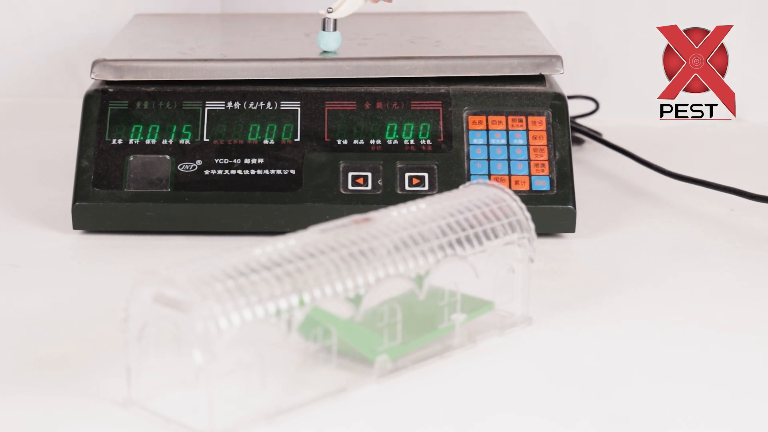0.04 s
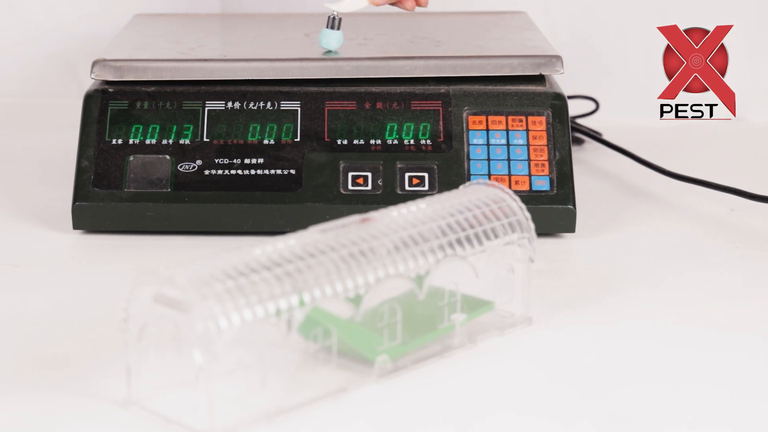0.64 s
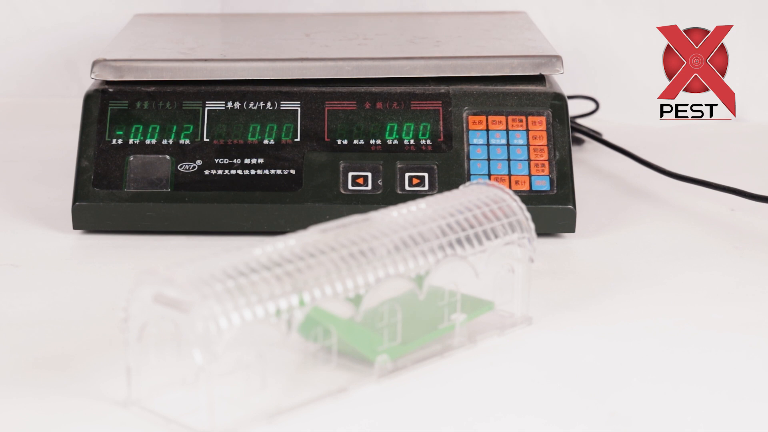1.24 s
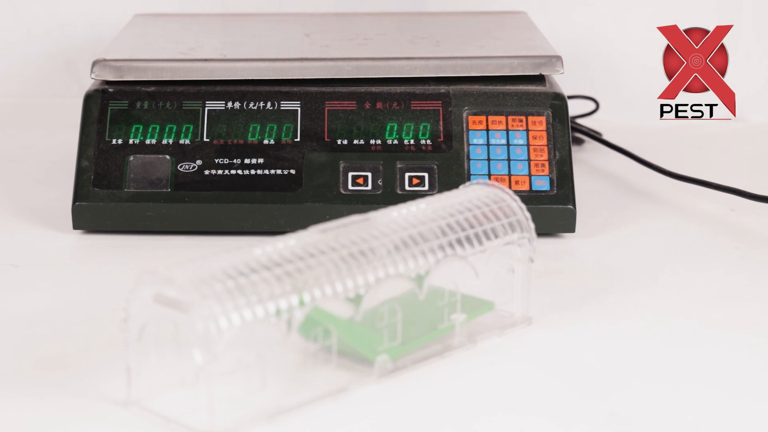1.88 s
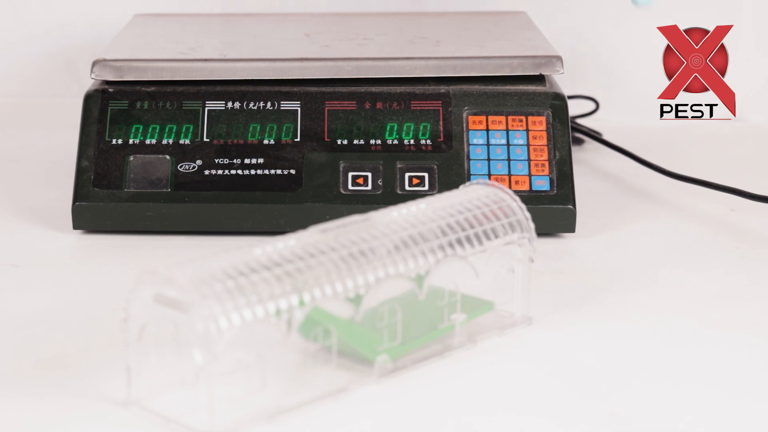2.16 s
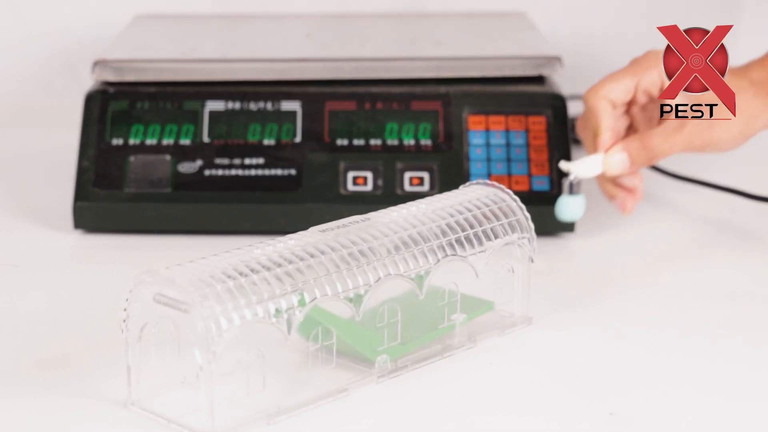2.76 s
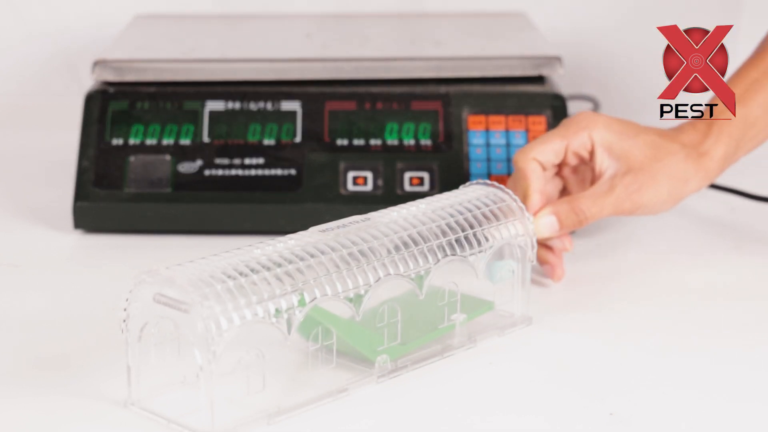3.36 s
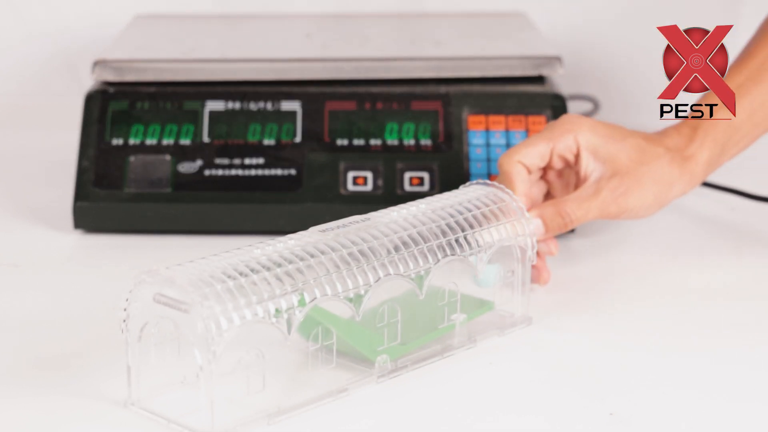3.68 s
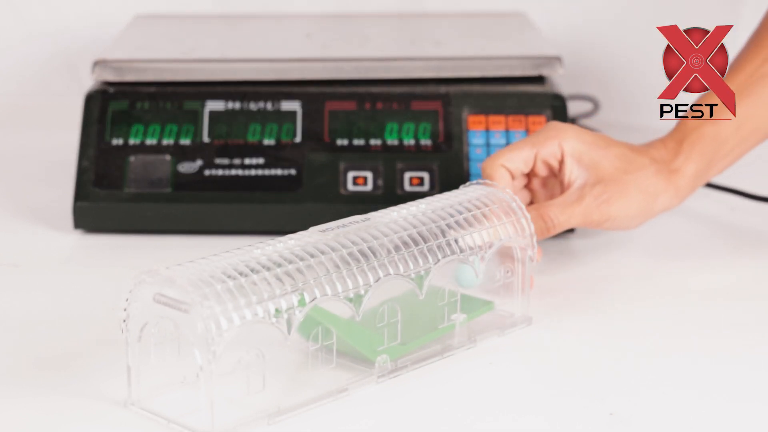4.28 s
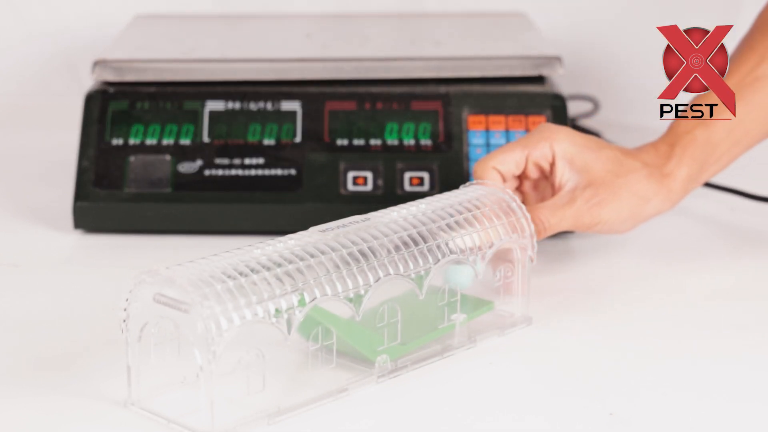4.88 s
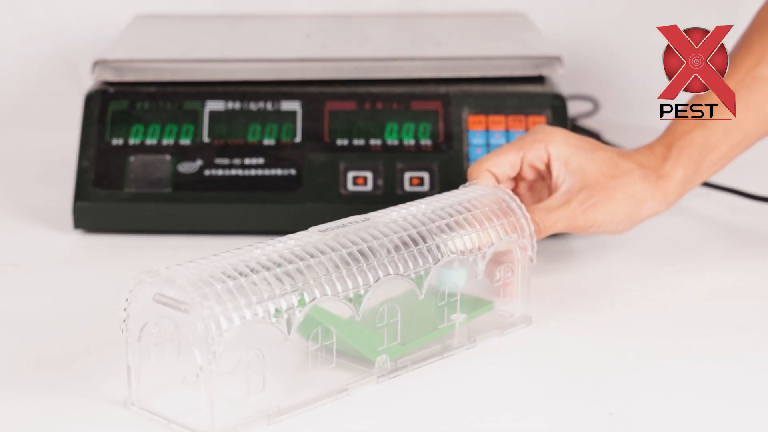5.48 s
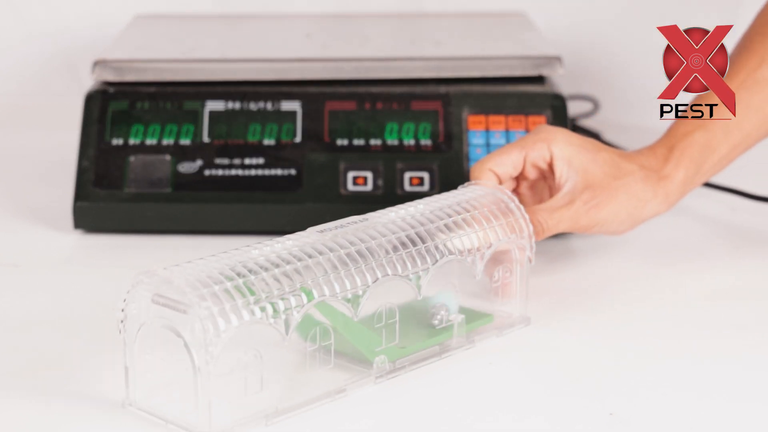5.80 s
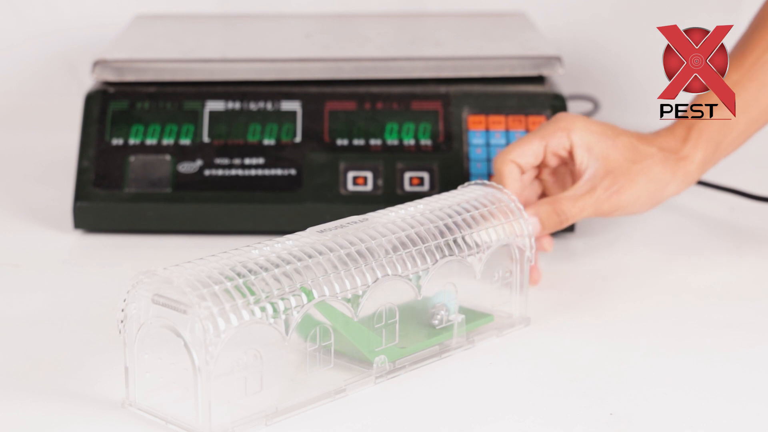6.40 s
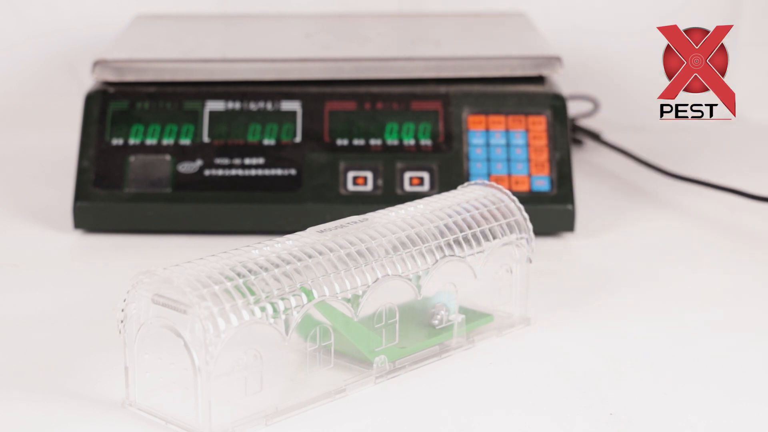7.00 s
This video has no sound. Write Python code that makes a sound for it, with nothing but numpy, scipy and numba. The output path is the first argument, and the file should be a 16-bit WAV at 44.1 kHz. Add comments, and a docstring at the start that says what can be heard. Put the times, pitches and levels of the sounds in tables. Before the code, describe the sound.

After faint ticks and scuffs over a steady ventilation hum, a plastic trap door snaps loudly shut, rebounds and rattles.

```python
"""Ventilation hums throughout in a small bare room. Early on come far ticks and a shuffle that bumps
something hollow, then two fainter scuffs. At 5.6 s a small weight tips the treadle of a plastic tunnel
trap: the latch slips, and the door slams, rebounds and rattles. Every blow rings the same shell and
fills the room. The microphones overload on the slam; the gain control ducks and recovers."""
import sys
import numpy as np
from scipy import signal
from scipy.fft import rfft, irfft
from scipy.io import wavfile
from scipy.ndimage import uniform_filter1d
from numba import njit

SR = 44100
rng = np.random.default_rng(int(sys.argv[2]) if len(sys.argv) > 2 else 0)


def dump(signal):
    """Clip the signal to [-1, 1] and save it as 16-bit WAV at the path in sys.argv[1]."""
    limited = np.clip(np.atleast_2d(signal).T, -1, 1)
    pcm = np.round(limited * 32767).astype(np.int16)
    wavfile.write(sys.argv[1], SR, pcm)


N = 319284
T = np.arange(N) / SR
RING_T = T[:int(.7 * SR)]


def undb(db):
    """Decibels to gain."""
    return 10 ** (np.asarray(db) / 20)


def fade(t60_s):
    """Exponential ring-down."""
    return np.exp(-np.log(1000) * RING_T / t60_s)


def unit_energy(x):
    """Scale to a mean energy of 1 per channel."""
    return x / np.sqrt(np.sum(x ** 2) / len(np.atleast_2d(x)))


def on_log_axis(hz, points):
    """Interpolate (freq_hz, value) points over log frequency."""
    freq_hz, value = np.transpose(points)
    return np.interp(np.log(hz + 1e-9), np.log(freq_hz), value)


def drift(rate_hz):
    """Smooth random drift, spread near 1."""
    knots = np.arange(0, T[-1] + 1, 1 / rate_hz)
    return np.interp(T, knots, rng.standard_normal(len(knots)))


def convolve(x, response):
    """Apply a response, keeping the length."""
    return signal.fftconvolve(x, np.atleast_2d(response), axes=1)[:, :x.shape[1]]


def add(out, start_s, x):
    """Mix x into out."""
    i = int(start_s * SR)
    out[:, i:i + x.shape[1]] += x[:, :N - i]


# Diffuse field at two close microphones: freq_hz, side_minus_mid_db
STEREO_WIDTH = [(60, -31), (110, -34.5), (200, -21.5), (380, -16.5), (700, -8), (1290, -5.5), (2380, 0),
                (4400, 0.5), (8120, 2), (15000, -3)]

def noise(colour, size, width_db=0):
    """Coloured stereo noise, rms 1: channels alike in the bass, unrelated in the treble."""
    hz = np.fft.rfftfreq(size, 1 / SR)
    mid, side = rfft(rng.standard_normal((2, size)))
    width = undb(on_log_axis(hz, STEREO_WIDTH) + width_db)
    pair = np.array([mid + width * side, mid - width * side]) / np.sqrt(1 + width ** 2)
    x = irfft(pair * undb(on_log_axis(hz, colour)), size)
    return x / x.std()


# Airflow spectrum: freq_hz, relative_db
AIR_COLOUR = [(15, -40.5), (25, -22.5), (91, -3), (169, -5), (198, -3), (221, -5.5), (378, -11),
              (421, -9.5), (684, -11), (762, -12.5), (826, -13.5), (1200, -14), (2170, -18.5),
              (13200, -55.5), (15500, -57.5)]
# Motor and fan tones: pitch_hz, rms_db
FAN_TONES = [(49, -65.5), (81, -62), (99, -59), (199.2, -55), (626, -62), (784, -58), (1093, -67),
             (1249, -67)]

def ventilation(air_db=-44.5, flutter_db=0.3, waver_db=1.5, wander_rad=1.2):
    """Steady air noise with wavering motor and fan tones."""
    out = noise(AIR_COLOUR, N) * undb(air_db + flutter_db * drift(rate_hz=5.3))
    for pitch_hz, rms_db in FAN_TONES:
        phase = 2 * np.pi * pitch_hz * T + wander_rad * drift(rate_hz=14)
        out += np.sqrt(2) * undb(rms_db + waver_db * drift(rate_hz=9.9)) * np.sin(phase)
    return out


# Far contacts: start_s, level_db, t60_s, ring_hz, ring_vs_scratch_db
TICKS = [(0.1164, -35.5, 0.28, 2690, -21), (.136, -34.5, 0.16, 13200, -31), (0.272, -44.5, 0.28, 4700, -7)]
# Scratch spectrum: freq_hz, relative_db
TICK_COLOUR = [(300, -30), (1300, -4.5), (2500, -2.5), (4200, -1.5), (6000, -11), (8500, -16.5),
               (11500, -29), (13200, -27), (15500, -38)]

def far_ticks(room_db=-4):
    """Small scratchy contacts, each with a brief ring, blurred by the room."""
    out = np.zeros((2, N))
    for start_s, level_db, t60_s, ring_hz, ring_vs_scratch_db in TICKS:
        scratch = noise(TICK_COLOUR, len(RING_T))
        ring = undb(ring_vs_scratch_db) * np.sin(2 * np.pi * ring_hz * RING_T)
        add(out, start_s, undb(level_db) * (scratch + ring) * fade(t60_s))
    return out + undb(room_db) * room(out)


# Reverberation bands: centre_hz, level_db, t60_s
ROOM_BANDS = [(150, -16, 0.31), (500, 4.5, 0.31), (1100, -3, 0.36), (2227, -3, 0.36), (4500, -0.5, 0.35),
              (7000, 2, 0.31), (10040, -5, 0.37), (15000, 7, .22)]

def room(x, gap_s=0.00063, build_s=0.0014):
    """Dense reflections build after a short gap; the top band dies soonest."""
    hz = np.fft.rfftfreq(len(RING_T), 1 / SR)
    centres_hz = [row[0] for row in ROOM_BANDS]
    white = noise([(f, 0) for f in centres_hz], len(RING_T), width_db=-1.5)
    spectrum = rfft(unit_energy(white))
    response = 0
    for (_, level_db, t60_s), weights in zip(ROOM_BANDS, np.eye(len(ROOM_BANDS))):
        band_gain = on_log_axis(hz, list(zip(centres_hz, weights)))
        band = irfft(spectrum * band_gain, len(RING_T))
        response += undb(level_db) * band * unit_energy(fade(t60_s)) * np.sqrt(len(RING_T))
    onset = 1 - np.exp(-np.maximum(RING_T - gap_s, 0) / build_s)
    return convolve(x, response * onset)


def strokes(rows, t60_s):
    """Envelope of strokes: each rises, holds and dies away."""
    gain = 0
    for start_s, level_db, rise_s, hold_s in rows:
        attack = np.clip((T - start_s) / rise_s, 0, 1)
        since_hold_s = np.maximum(T - start_s - rise_s - hold_s, 0)
        gain += undb(level_db) * attack * np.exp(-np.log(1000) * since_hold_s / t60_s)
    return gain


# Scuffs across the room: start_s, level_db, rise_s, hold_s
SCUFFS = [(.266, -37.5, 0.051, 0.069), (1.22, -53.5, 0.16, 0.079), (1.98, -50, 0.07, 0.066)]
# Rubbing spectrum: freq_hz, relative_db
SCUFF_COLOUR = [(200, -6), (410, -6), (490, 12), (620, -2.5), (754, 4), (900, -2), (1400, -1), (2000, 2.5),
                (2800, -4), (4500, -8), (7000, -19), (8800, -30.5), (15000, -42)]

def shuffle(uneven_db=1.1, wash_db=-9, wash_top_hz=2500):
    """Soft, uneven scuffs over a faint, dull wash of room noise that fades slowly."""
    rub = noise(SCUFF_COLOUR, N) * strokes(SCUFFS, t60_s=0.76)
    rub *= undb(uneven_db * drift(rate_hz=44))
    lowpass = signal.butter(2, wash_top_hz, fs=SR, output="sos")
    wash = signal.sosfilt(lowpass, noise(SCUFF_COLOUR, N))
    return rub + undb(wash_db) * wash * strokes(SCUFFS, t60_s=3.3)


def knock(modes, start_s, push_s):
    """Damped modes that build up under a soft push."""
    ring = sum(undb(db) * np.sin(2 * np.pi * hz * RING_T) * fade(t60_s) for hz, db, t60_s in modes)
    onset = 1 - np.exp(-RING_T / push_s)
    out = np.zeros((2, N))
    add(out, start_s, np.atleast_2d(ring * onset))
    return out


# Hollow body modes: pitch_hz, level_db, t60_s
BUMP_MODES = [(479.6, -41, 0.88), (527, -43, 0.41), (620, -42, 0.61), (747, -39.5, 0.54), (1102, -46, 0.89),
              (1270, -54, 0.87)]

def bump():
    """A hollow body rings, nudged during the first scuff."""
    return knock(BUMP_MODES, start_s=.306, push_s=.02)


# Latch slips: start_s, level_db, rise_s, hold_s
SLIPS = [(5.635, -36.5, 0.01, .003), (5.667, -25, 0.011, .001)]
# Scrape spectrum: freq_hz, relative_db
LATCH_COLOUR = [(200, -50), (1500, -31), (3400, -6.5), (4050, -1), (4700, -7.5), (7500, -18.5),
                (11000, -24.5), (13500, -21.5), (16000, -33.5)]

def latch():
    """The latch scrapes twice on its catch, the second time right off it."""
    return noise(LATCH_COLOUR, N, width_db=-1.0) * strokes(SLIPS, t60_s=0.0693)


# Treadle modes: pitch_hz, level_db, t60_s
TREADLE_MODES = [(491, -40.5, .09), (589, -19.5, .11), (735, -28.5, 0.15)]

def treadle():
    """The treadle knocks as it tips under the weight."""
    return knock(TREADLE_MODES, start_s=5.643, push_s=0.0024)


# Dense plastic modes, bunched near 1.1 and 1.6 kHz: freq_hz, relative_db
CRACK_COLOUR = [(100, -22), (380, 1), (580, 0.5), (830, -5.5), (1060, 11), (1390, -3.5), (1620, 8),
                (1850, 4), (2100, 1.5), (2550, 3), (3200, 0), (4500, 0), (7000, -5), (9000, -9),
                (11000, -16), (14000, -11.5), (16000, -20.5)]

def crack(level_db=-7.0, t60_s=0.019):
    """Dry crack of one touch: dense modes that die at once."""
    return undb(level_db) * noise(CRACK_COLOUR, len(RING_T), width_db=-4.5) * fade(t60_s)


# Shell and door modes: pitch_hz, level_db, t60_s
SHELL_MODES = [(319, -20, 0.07), (460, -17, 0.07), (536, -13, 0.12), (576, -9.5, 0.1), (678, -18, 0.09),
               (1005, -6.5, 0.045), (1063, -7, 0.07), (1078, -14, 0.36), (1136, -1.5, 0.045),
               (1250, -7.5, .09), (1557, -3, 0.025), (1616, -2, 0.05), (2060, -2, 0.031),
               (2090, -0.5, 0.041), (2440, -21, .09), (2967, -9, 0.0299), (3490, -18.5, 0.36),
               (4000, -11.5, 0.091), (4360, -8, .035), (4390, -21.5, 0.048), (5700, -28.5, 0.26),
               (5800, -10.5, .03), (6510, -33.5, 0.2)]

def shell_ring(ring_db=-10.5, spread_hz=8000, scatter_db=0.9, detune=.004):
    """Modes start in step, then beat: a clack and a ring. The door's seating shifts them each blow."""
    ring = 0
    for pitch_hz, level_db, t60_s in SHELL_MODES:
        strength, skew, shift = rng.standard_normal(3)
        # short waves reach the two microphones out of step
        phase = np.array([[1], [-1]]) * skew * pitch_hz / spread_hz / 2
        wave = np.sin(2 * np.pi * pitch_hz * (1 + detune * shift) * RING_T + phase)
        ring += undb(level_db + scatter_db * strength) * wave * fade(t60_s)
    return undb(ring_db) * ring


def whiten(burst, width_hz=400):
    """Flatten a burst's broad spectral peaks and dips, keeping its shape in time."""
    size = 2 * len(RING_T)
    spectrum = rfft(burst, size)
    power = uniform_filter1d(np.abs(spectrum) ** 2, int(width_hz * size / SR))
    return irfft(spectrum / np.sqrt(np.abs(power) + 1e-12))[:len(RING_T)]


def contact(decay_s, chatter_db, rate_hz=1500):
    """Force of one impact and a dying flurry of tiny re-contacts."""
    touches = (rng.random(len(RING_T)) < rate_hz / SR) * rng.standard_normal(len(RING_T))
    force = undb(chatter_db) * unit_energy(touches * np.exp(-RING_T / decay_s) + 1e-18)
    force[0] += 1
    return unit_energy(whiten(force))


def blow(level_db, bright_hz, bass_cut_hz, chatter_db, crack_db,
         chatter_s=.0095, halving_db=11.5, rock_s=.002, rock_db=-1.5, bright_kept=0.77):
    """A part rings the shell and rocks to rest in three touches, each weaker and duller."""
    decay_s = chatter_s * 2 ** (-level_db / halving_db)  # hard blows seat sooner
    # small parts radiate little bass, soft contacts little treble
    radiation = signal.butter(4, bass_cut_hz, "high", fs=SR, output="sos")
    out = np.zeros((2, 2 * len(RING_T)))
    for k in range(3):
        softness = signal.butter(2, bright_hz * bright_kept ** k, fs=SR, output="sos")
        response = undb(crack_db) * crack() + (shell_ring() if k == 0 else 0)
        touch = convolve(response, contact(decay_s, chatter_db))
        touch = signal.sosfilt(np.vstack([softness, radiation]), touch)
        add(out, k * rock_s, undb(level_db + k * rock_db) * touch)
    return out


# Blows on the shell: start_s, level_db, bright_hz, bass_cut_hz, chatter_db, crack_db, send_db
BLOWS = [(5.637, -28, 8050, 410, 5.5, 5, 11), (5.648, -14, 1100, 450, 16, -4, -2),
         (5.670, -12.5, 1780, 420, 4, 1, -3), (5.6838, 18, 14500, 337, -7, 1, -2.5),
         (5.7366, 14.5, 2500, 900, -22, 0, -7), (5.7685, -1.5, 4000, 596, -17, 7.5, 4.5),
         (5.790, -4, 2200, 430, 7, -2, 2), (5.8100, -8, 11000, 450, 5, 10, -0.5),
         (5.836, -8.5, 5500, 415, -2, -11, 1), (5.865, -6, 900, 398, -26, 1, -4),
         (5.891, -14.5, 1510, 420, -1, -13, -3), (5.913, -15, 1500, 500, -19, -6, -6)]

def trap(room_db=-2):
    """Latch, treadle, slam and rebounds; each blow sends its own share into the room."""
    direct = latch() + treadle()
    to_room = direct.copy()
    for start_s, level_db, bright_hz, bass_cut_hz, chatter_db, crack_db, send_db in BLOWS:
        hit = blow(level_db, bright_hz, bass_cut_hz, chatter_db, crack_db)
        add(direct, start_s, hit)
        add(to_room, start_s, undb(send_db) * hit)
    return direct + undb(room_db) * room(to_room)


def scene():
    """Everything in the room."""
    return ventilation() + far_ticks() + shuffle() + bump() + trap()


@njit
def follow(x, attack_s, release_s):
    """Envelope with separate rise and fall time constants."""
    out, level = np.empty(len(x)), 0.
    for i in range(len(x)):
        level += (x[i] - level) / (SR * (attack_s if x[i] > level else release_s))
        out[i] = level
    return out


def record(dry, threshold_db=-6.5, attack_s=0.0018, release_s=0.084,
           balance_db=-0.82, ceiling=.95, top_hz=15600):
    """Gain control too slow for the slam, which saturates the input stage; then the top is cut."""
    x = dry * undb(np.array([[balance_db], [-balance_db]]) / 2)
    envelope = follow(np.abs(x).max(axis=0), attack_s, release_s)
    ducked = x / np.maximum(envelope / undb(threshold_db), 1)
    saturated = ducked / (1 + (ducked / ceiling) ** 8) ** (1 / 8)
    lowpass = signal.ellip(8, .2, 70, top_hz, fs=SR, output="sos")
    return signal.sosfilt(lowpass, saturated)


dry = scene()
out = record(dry)
dump(out)
```